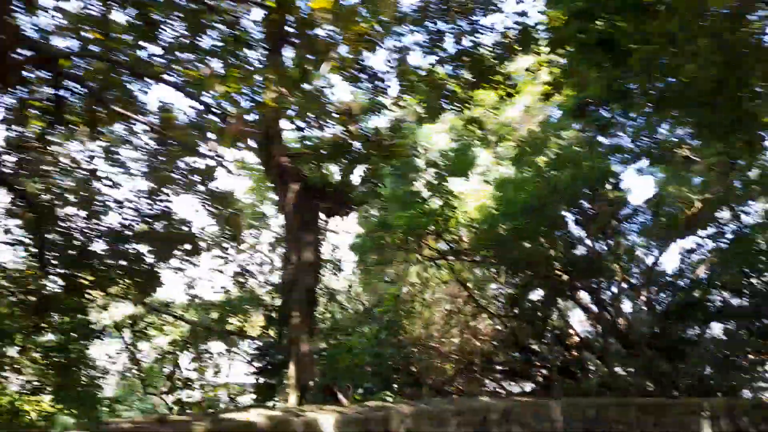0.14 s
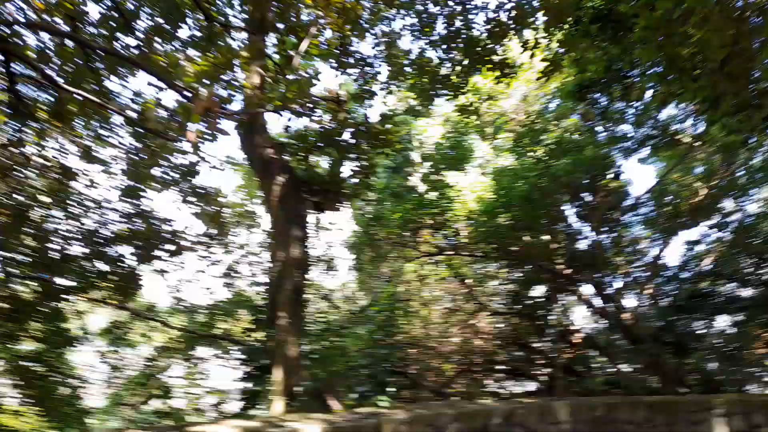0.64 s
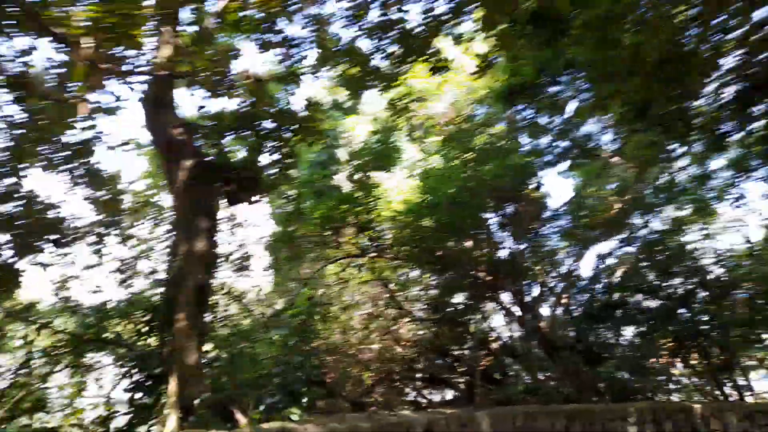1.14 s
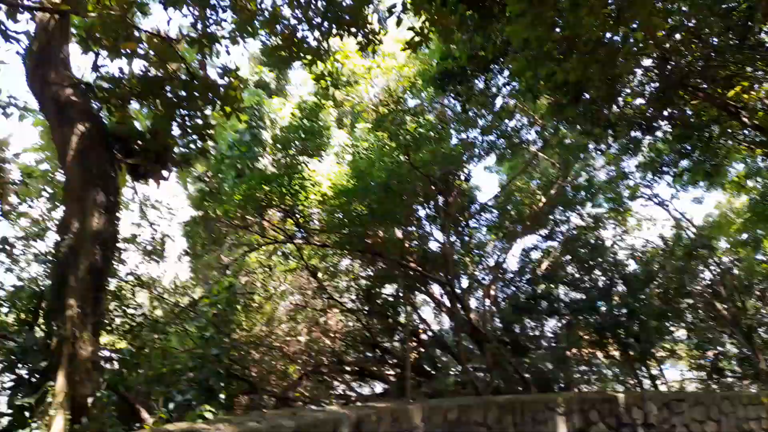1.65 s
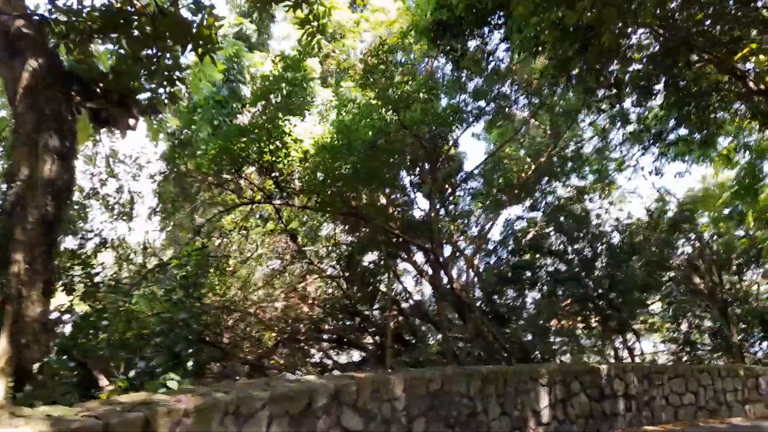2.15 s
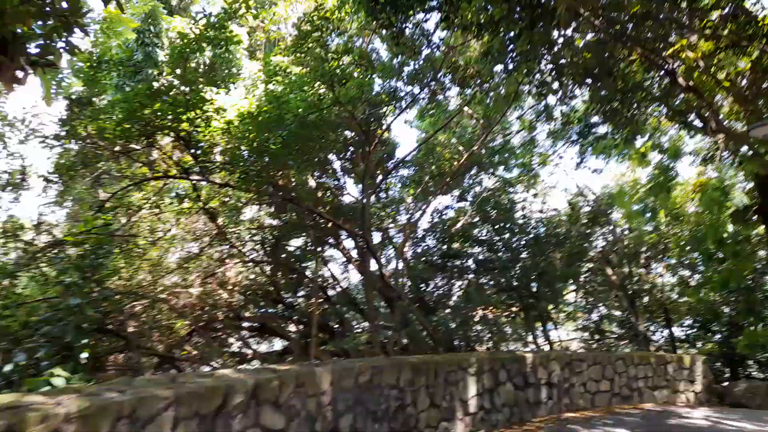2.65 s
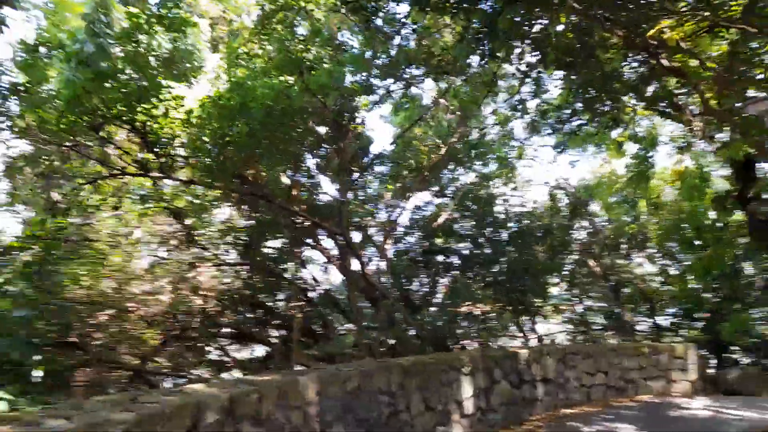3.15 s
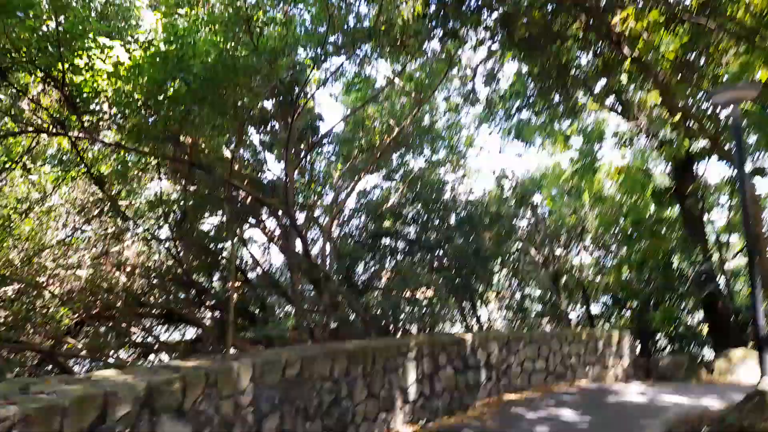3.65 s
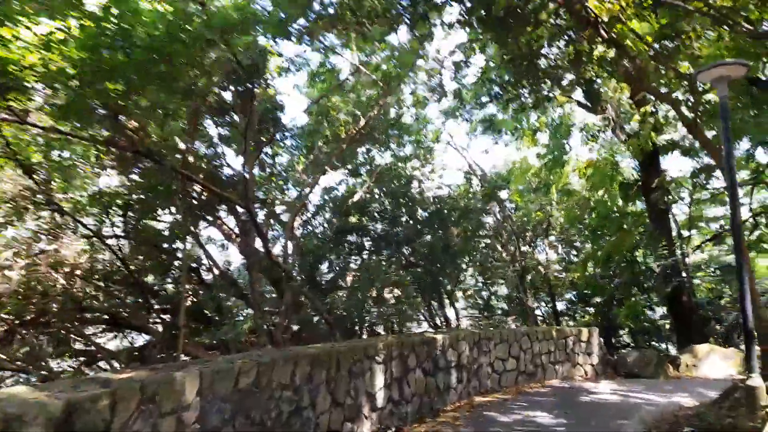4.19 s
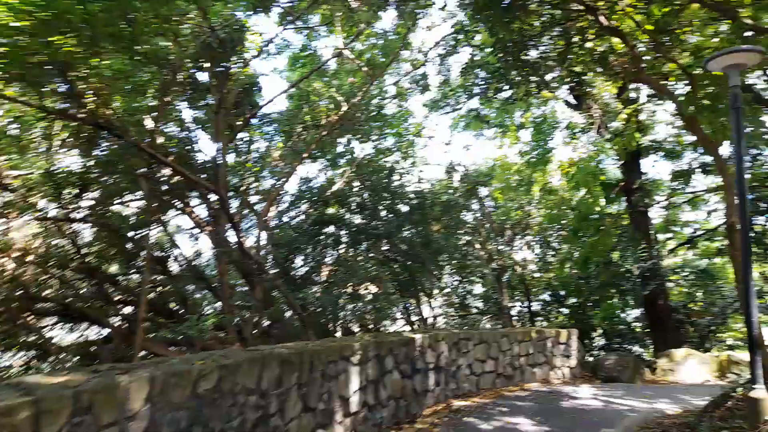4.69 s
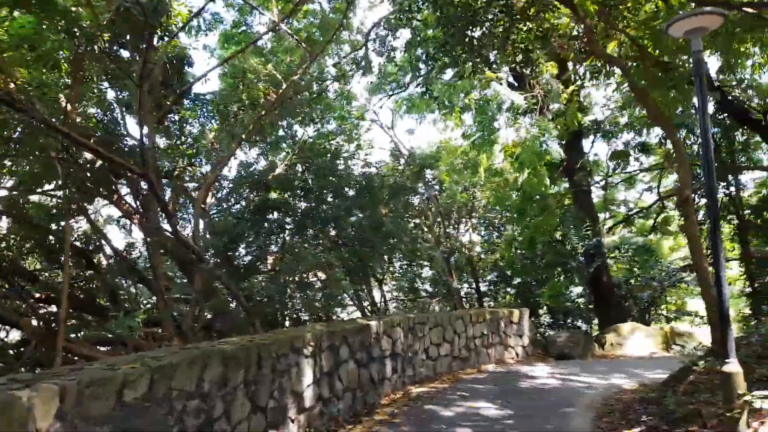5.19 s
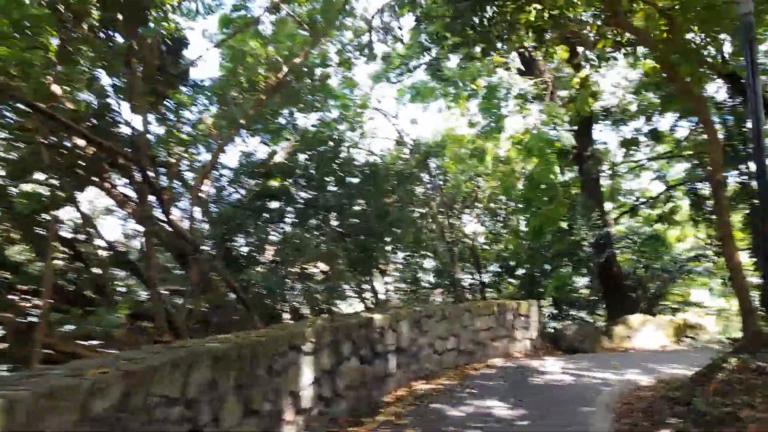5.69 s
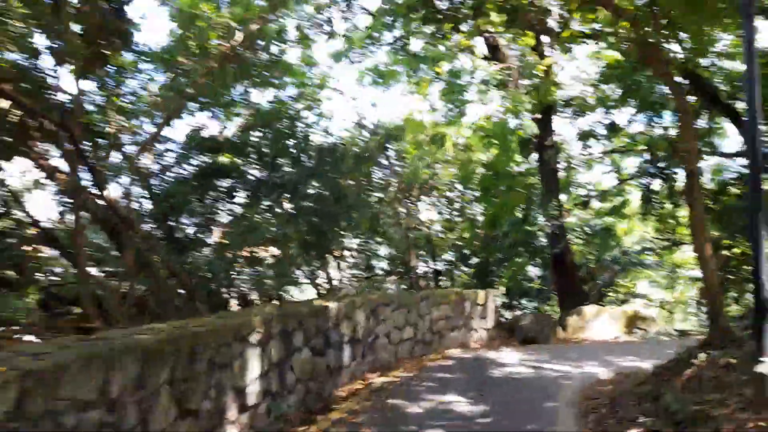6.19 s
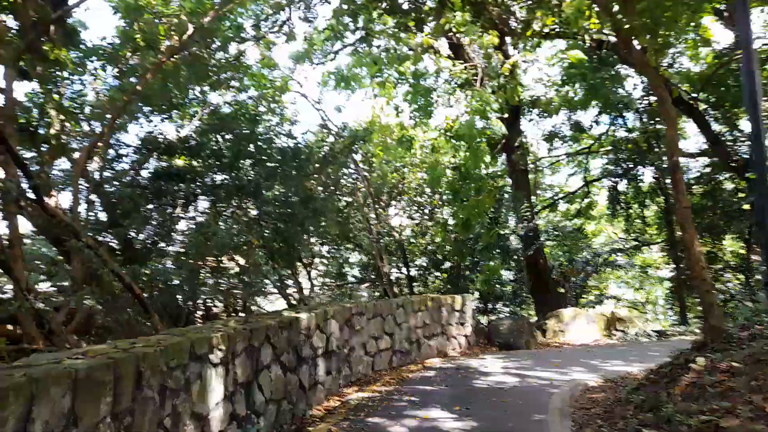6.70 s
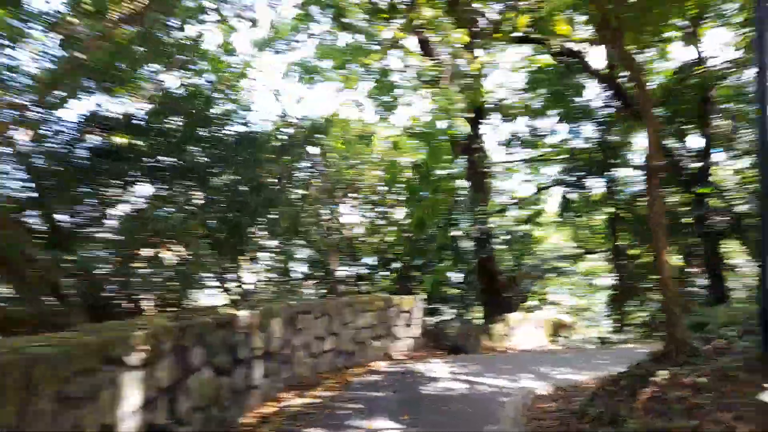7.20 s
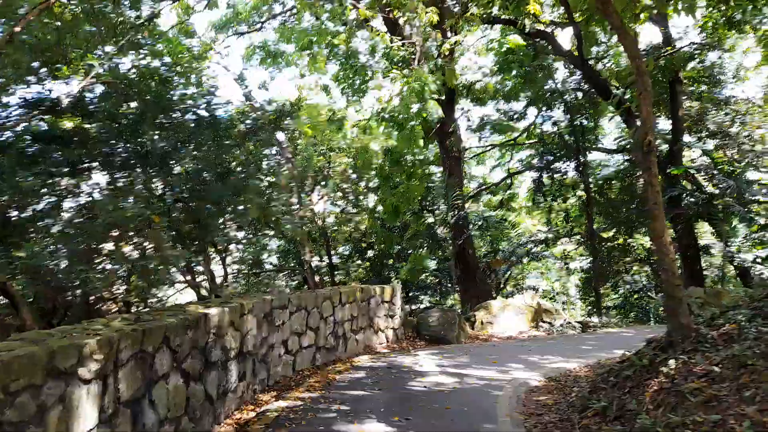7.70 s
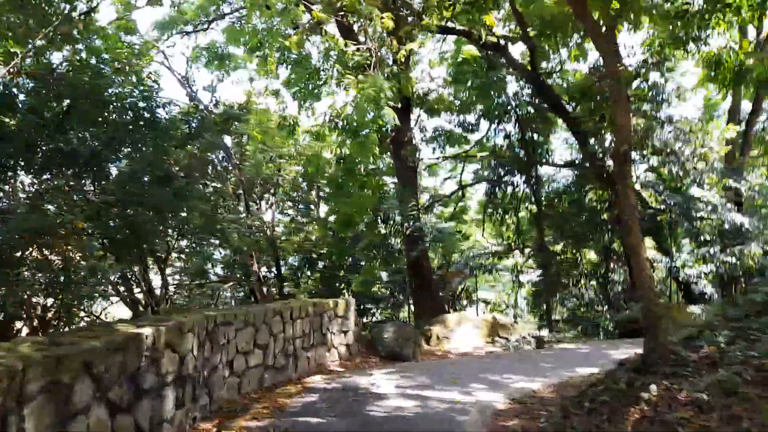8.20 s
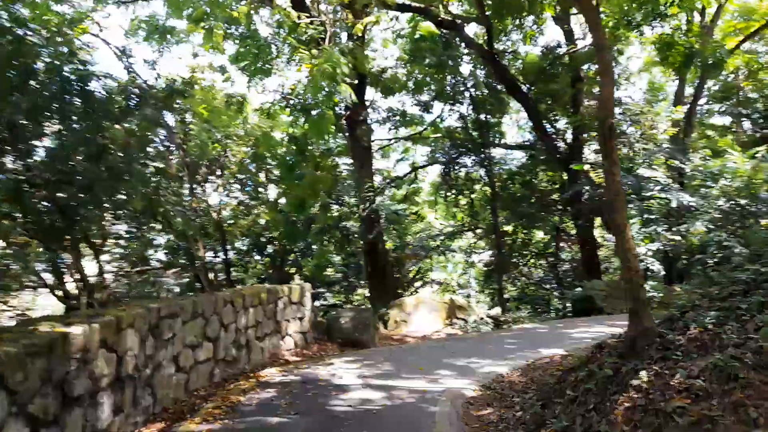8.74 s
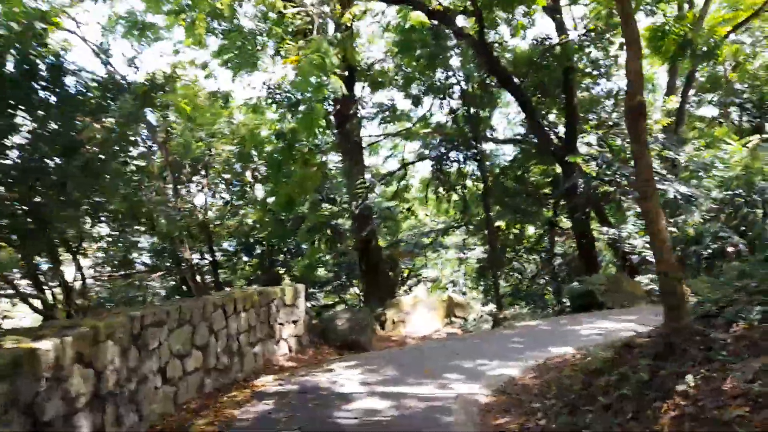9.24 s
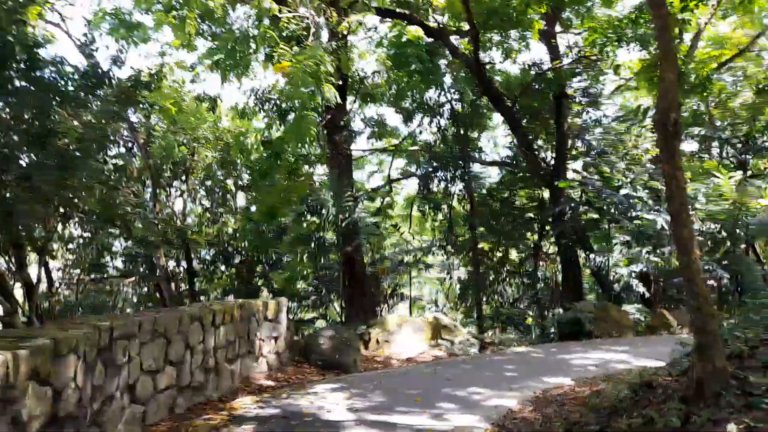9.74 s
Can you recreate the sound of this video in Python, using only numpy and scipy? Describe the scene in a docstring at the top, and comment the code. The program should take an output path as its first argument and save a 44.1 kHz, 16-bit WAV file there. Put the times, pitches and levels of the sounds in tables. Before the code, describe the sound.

Several cicadas sing shrill pulsing phrases about once a second over a hissing far chorus, with small bird calls, grit crunches and distant traffic rumble.

```python
"""Three cicadas in a wooded park

Three cicadas sing falling phrases, as rib overtones on a slowing beat, over a far chorus of banded noise.
Small birds whistle and chirp in gliding tones; a far crow caws through a moving throat resonance.
Shoes crunch grit and snap twigs in bursts of filtered cracks, and the hand-held camera is knocked.
Leaf noise, town rumble and narrow bands of engine drone lie underneath; tree echoes surround the nearer sounds."""
import sys
import numpy as np
from scipy import signal
from scipy.fft import rfft, irfft
from scipy.io import wavfile
from scipy.ndimage import uniform_filter1d

SR = 44100
rng = np.random.default_rng(int(sys.argv[2]) if len(sys.argv) > 2 else 0)


def int16_out(signal):
    """Quantize to a 16-bit WAV file."""
    q = np.round(np.clip(np.atleast_2d(signal).T, -1, 1) * 32767)
    wavfile.write(sys.argv[1], SR, q.astype(np.int16))


def natural_amplitude(level_db):
    """Convert a level in decibels to a linear amplitude factor, elementwise."""
    exponent = np.asarray(level_db, float) / 20
    return 10 ** exponent


N = 434826


def evened(x):
    """Scales to rms 1."""
    return x / np.sqrt(np.mean(x ** 2) + 1e-20)


def read(points, hz):
    """Reads a spectrum on a log-frequency axis."""
    f, value = np.transpose(points)
    return np.interp(np.log(hz + 1), np.log(f + 1), value)


def curves(rows, t):
    """Every column of a time table at times t."""
    time_s, *columns = np.transpose(rows)
    return [np.interp(t, time_s, column) for column in columns]


def add(mix, start_s, sound, side_db):
    """Places a sound at start_s, leaning left by side_db."""
    part = mix[:, round(start_s * SR):][:, :len(sound)]
    part += natural_amplitude([[side_db / 2], [-side_db / 2]]) * sound[:part.shape[1]]


# how alike diffuse noise is at the two microphone ports: pitch_hz, likeness (1 same, 0 unrelated, -1 opposite)
LIKENESS = [(60, 1), (250, 0.83), (450, 0.76), (800, -0.14), (1200, -0.2), (2500, 0.069), (12000, 0.076)]


def noise(colour, patchy_db):
    """Diffuse stereo noise of rms 1, coloured over frequency, with drifting loud and soft patches."""
    frames, hz = N // 512 + 5, np.fft.rfftfreq(2048, 1 / SR)
    a, b, c, d, patches = rng.standard_normal((frames, 1025, 5)).T
    patches = uniform_filter1d(patches, size=20, axis=0)  # over frequency
    patches = evened(uniform_filter1d(patches, size=8, axis=1))  # over time
    same = np.clip(read(LIKENESS, hz), -1, 1)[:, None]
    left = a + 1j * b
    right = same * left + np.sqrt(1 - same ** 2) * (c + 1j * d)
    spectrum = np.array([left, right]) * colour(hz)[:, None] * natural_amplitude(patchy_db * patches)
    return evened(signal.istft(spectrum, nperseg=2048, noverlap=1536)[1][:, :N])


def wood(x, t60, echo_db):
    """Direct sound plus scattering by trunks and leaves: sparse taps for each ear, shifting at 1.9 Hz."""
    at = np.arange(200, SR // 2 - 20, 20)
    echoes = np.zeros((2, N))
    for k in range(3):
        taps = np.zeros((2, SR // 2))
        place = at + rng.integers(0, 20, (2, len(at)))
        sign = rng.choice([-1., 1.], (2, len(at)))
        np.put_along_axis(taps, place, sign * natural_amplitude(-60 * at / SR / t60), 1)
        # three tap sets trade places; the squares of their shares sum to 1
        share = np.sqrt(2 / 3) * np.cos(2 * np.pi * (1.9 * np.arange(N) / SR + k / 3))
        echoes += signal.oaconvolve(x * share, taps / np.linalg.norm(taps[0]), axes=1)[:, :N]
    return x + natural_amplitude(echo_db) * echoes


# spectrum of the distant town: pitch_hz, relative level_db per Hz
TOWN_SPECTRUM = [(15, -46), (25, -31), (59, -17), (113, -2.5), (257, -3), (332, -5), (396, -10), (574, -7),
                 (884, -8.5), (1140, -12.5), (2700, -23.5), (3510, -28), (5940, -120)]


def town_rumble():
    """Distant town: low diffuse noise, a little stronger on the right."""
    level_db = -47 + np.array([[.5], [1.5]])
    return natural_amplitude(level_db) * noise(lambda hz: natural_amplitude(read(TOWN_SPECTRUM, hz)), 0.8)


# far engines pulling through a gear: start_s, length_s, from_hz, to_hz, level_db
ENGINE_PULLS = [(0.266, 1.55, 90.6, 127.7, -50.5), (2.088, 1.44, 93.6, 100, -48),
                (1.1, 2.6, 58.4, 57.95, -55.5), (4.753, 2.2, 38.63, 55.1, -57),
                (7.003, 1.84, 53.4, 57.84, -51.5), (8.808, 1, 59.1, 61.2, -47.5)]
# steady far traffic: pitch_hz, width_hz, level_db
TRAFFIC_DRONES = [(56.8, 25, -53.5), (102.9, 15, -56.5)]


def engines():
    """Narrow wavering bands of far traffic, nearly the same in both ears; most pulls climb in pitch."""
    pull_width_hz, pull_firm = 6, .8  # firm: the share of steady tone in the amplitude
    hop = 100  # samples between points of the slow waver
    out, t = np.zeros((2, N)), np.arange(N) / SR
    rows = [(-1, 12, hz, hz, db, width_hz, 0) for hz, width_hz, db in TRAFFIC_DRONES]
    rows += [row + (pull_width_hz, pull_firm) for row in ENGINE_PULLS]
    for start_s, length, from_hz, to_hz, db, width_hz, firm in rows:
        u = np.clip((t[::hop] - start_s) / length, 0, 1)
        r = np.exp(-np.pi * width_hz * hop / SR)
        draws = rng.standard_normal((len(u), 2, 2)) @ [1, 1j]
        common, apart = signal.lfilter([1], [1, -2 * r, r * r], draws, axis=0).T
        size = np.sqrt(np.mean(abs(np.array([common, apart])) ** 2) / 2)
        slow = (common + 0.23 * apart * np.array([[1], [-1]])) / size
        slow = (firm + np.sqrt(1 - firm ** 2) * slow / np.sqrt(2)) * np.sqrt(2)
        slow = slow * np.clip(np.minimum(u, 1 - u) * length / 0.24, 0, 1)  # fades in and out
        hz = np.interp(t, t[::hop], from_hz + (to_hz - from_hz) * u)
        for ear in (0, 1):
            waver = np.interp(t, t[::hop], slow[ear])
            out[ear] += natural_amplitude(db) * (waver * np.exp(2j * np.pi * np.cumsum(hz) / SR)).real
    return out * natural_amplitude([[-.4], [.6]])


# spectrum of the leaves: pitch_hz, relative level_db per Hz
LEAF_SPECTRUM = [(1500, -1), (2500, 0.5), (4000, 0), (5300, -4), (6800, 0), (7150, -41), (7800, -8.5),
                 (8400, -4), (11000, -11.5), (13600, -7), (14200, -18), (16000, -37)]


def leaf_rustle():
    """Leaves all around: diffuse patchy noise above 1 kHz."""
    return natural_amplitude(-51.5) * noise(lambda hz: natural_amplitude(read(LEAF_SPECTRUM, hz)) * (hz > 1000), 2.36)


# body bands of the far chorus and of the rattle that ends a phrase: pitch_hz, width_hz, relative level_db
BODY_BANDS = [(3135, 425, -10.5), (6186, 630, -14), (9430, 860, -18), (10450, 1800, -23.5),
              (12280, 930, -0.5), (13160, 640, -15), (15300, 500, -34)]


def body_gain(hz):
    """Gain of the cicada body: steep-sided humps, summed in power."""
    return np.sqrt(sum(natural_amplitude(2 * db) / (1 + (2 * (hz - f) / abs(w)) ** 4) ** 2 for f, w, db in BODY_BANDS))


# far chorus over time: time_s, level_db before the lean to the left
CHORUS_LEVEL = [(0, -40.5), (1.5, -41.5), (3, -40.5), (4.5, -41.5), (6, -43), (7, -40), (8, -39), (9, -41),
                (9.86, -40.5)]


def far_chorus():
    """Many distant cicadas merge into noise in the body bands, 3 dB stronger on the left."""
    level_db = curves(CHORUS_LEVEL, np.arange(N) / SR)[0]
    return natural_amplitude(level_db + np.array([[1.5], [-1.5]])) * noise(body_gain, 1.54)


# far crow, before tree echoes: time_s, level_db, throat_hz
CROW_CAW = [(9.02, -61, 1220), (9.1, -60, 1230), (9.18, -67, 1420), (9.35, -58, 1440), (9.6, -65, 1400),
            (9.68, -73, 1400)]


def crow():
    """A far, slightly hoarse harmonic caw through one moving throat resonance."""
    pitch_hz, throat_width_hz = 307.6, 260
    t = np.arange(CROW_CAW[0][0], CROW_CAW[-1][0], 1 / SR)
    level_db, throat_hz = curves(CROW_CAW, t)
    jitter = 0.24 * uniform_filter1d(rng.standard_normal(len(t)), size=300)
    turns = np.cumsum(pitch_hz * (1 + jitter)) / SR
    caw = 0
    for k in range(5, 14):  # steps of half the pitch; the odd ones are weak
        weight = .3 if k % 2 else 1
        throat = 1 / (1 + ((k * pitch_hz / 2 - throat_hz) / throat_width_hz) ** 2)
        caw = caw + weight * throat * np.cos(np.pi * k * turns)
    out = np.zeros((2, N))
    add(out, t[0], natural_amplitude(level_db) * evened(caw), 1.5)
    return out


# bird whistles, before tree echoes: start_s, length_s, from_hz, to_hz, level_db
BIRD_WHISTLES = [(0.203, 0.16, 5450, 3360, -55.5), (1.654, .12, 6880, 6530, -57),
                 (2.179, 0.13, 5400, 3150, -47.5), (2.513, 0.13, 5330, 3460, -52.5),
                 (4.14, 0.13, 6920, 6680, -57), (4.38, 0.075, 4000, 4850, -59),
                 (4.498, 0.1, 3600, 3740, -58.5), (4.633, 0.1, 5350, 3750, -53.5),
                 (4.72, 0.18, 799, 883, -58), (4.96, 0.095, 870, 880, -61), (5.09, .08, 829, 886, -57),
                 (2.82, 0.27, 1107, 1080, -64), (7.742, .14, 587, 594, -60.5), (9.5, 0.15, 816, 838, -63),
                 (4.848, 0.26, 1685, 1755, -68), (5.124, 0.1, 2740, 2700, -63),
                 (5.377, 0.058, 5340, 5200, -63), (6.489, 0.11, 6840, 6640, -56),
                 (6.497, .14, 900, 987, -62), (6.77, 0.11, 4340, 4900, -63), (6.941, 0.08, 5420, 3680, -54),
                 (7.39, 0.096, 5360, 3260, -48.5), (8.085, 0.076, 4060, 4940, -57.5),
                 (9.08, 0.085, 6760, 6650, -60), (9.51, 0.157, 3540, 3730, -60.5),
                 (9.645, 0.083, 4900, 3250, -60)]


def bird_whistles():
    """Near-sine wavering whistles; falling ones hold, plunge and level out."""
    out = np.zeros((2, N))
    for start_s, length, from_hz, to_hz, db in BIRD_WHISTLES:
        u = np.linspace(0, 1, round(length * SR))
        glide = u ** 3.6 * (1 + .09) / (u ** 3.6 + .09) if to_hz < from_hz else u
        tone = np.sin(2 * np.pi * np.cumsum(from_hz + (to_hz - from_hz) * glide) / SR)
        waver_db = 2.2 * evened(uniform_filter1d(rng.standard_normal(SR // 2), size=350))[:len(u)]
        shape = signal.windows.tukey(len(u), .5)
        add(out, start_s, natural_amplitude(db) * np.sqrt(2) * tone * natural_amplitude(waver_db) * shape, 0)
    return out


# buzzy chirps, before fading and tree echoes: start_s, centre_hz, level_db
BIRD_CHIRPS = [(2.095, 2500, -53), (4.255, 2430, -45.5), (4.85, 2700, -50), (6.25, 2670, -64),
               (6.57, 2180, -54), (6.58, 2620, -50), (6.85, 2230, -47.5), (8.24, 2480, -55.5),
               (9.585, 2460, -46.5), (9.81, 2380, -46)]


def bird_chirps():
    """Short falling chirps chopped by a 140 Hz flutter."""
    out = np.zeros((2, N))
    t = np.arange(round(.035 * SR)) / SR
    chop = 2.2 + np.cos(2 * np.pi * 140 * t)
    for start_s, hz, db in BIRD_CHIRPS:
        tone = np.sin(2 * np.pi * hz * (1.05 * t - 1.5 * t ** 2))  # slides down a tenth
        add(out, start_s, natural_amplitude(db) * evened(chop * tone) * np.hanning(len(t)), 0)
    return out


def crackle(rows):
    """Bursts of tiny uneven cracks, each coloured by one hump, rising fast and dying away."""
    out = np.zeros((2, N))
    hz, t = np.fft.rfftfreq(8192, 1 / SR), np.arange(8192) / SR
    for start_s, length, db, centre_hz, octaves in rows:
        cracks = rng.standard_normal(8192) * natural_amplitude(2.7 * rng.exponential(1, 8192))
        colour = np.exp(-.5 * (np.log2(hz / centre_hz + 1e-6) / octaves) ** 2)
        shape = np.minimum(t / length / 0.12, 1) * np.exp(-(t / length) ** 2)
        add(out, start_s, natural_amplitude(db) * evened(irfft(rfft(cracks) * colour)) * shape, -1.5)
    return out


# grit under a shoe, before decay and echoes: start_s, length_s (decay), level_db, centre_hz, width_octaves
GRIT_CRUNCHES = [(1.487, 0.07, -51.5, 4300, 0.55), (2.688, 0.01, -39, 3020, 0.68),
                 (3.393, 0.025, -45.5, 2150, 1.1), (5.196, 0.085, -49, 1700, 1.1),
                 (5.721, 0.099, -46, 3500, 2.3), (5.8, 0.067, -36.5, 9600, 1.2),
                 (5.842, .05, -51, 7000, 1.3), (8.183, 0.0074, -41.5, 3460, .87),
                 (8.866, 0.046, -36.5, 5460, 2), (8.955, .037, -41, 9000, 1.2),
                 (9.804, 0.075, -51.5, 4600, 0.19)]


def grit():
    """Grains grind and crack under a shoe close by."""
    return crackle(GRIT_CRUNCHES)


# dry twigs and leaves snapping, before decay and echoes: start_s, level_db, centre_hz
TWIG_SNAPS = [(2.783, -39.5, 3020), (2.829, -38, 3200), (2.847, -39, 3800), (2.869, -38, 3300),
              (8.322, -37, 4370), (8.328, -37, 4800), (8.342, -31, 3980), (8.357, -53, 4920),
              (8.456, -40, 4300), (8.464, -40, 4180), (8.495, -46, 5000)]


def twigs():
    """Dry twigs and leaves snap: crack bursts that die within milliseconds."""
    length_s, width_octaves = .003, .55
    return crackle([(start_s, length_s, db, hz, width_octaves) for start_s, db, hz in TWIG_SNAPS])


# knocks at the camera: start_s, pitch_hz, level_db (peak of the main mode before decay and echoes), t60_s
CAMERA_KNOCKS = [(5.195, 790, -34, 0.065), (5.26, 650, -39, 0.084)]
# modes of the camera case: multiple of the knock's pitch, relative level_db
CASE_MODES = [(.61, -8), (1, 0), (1.28, -6), (1.5, -11)]


def knocks():
    """Dull knocks of the camera in the hand: damped sine modes of its case."""
    out = np.zeros((2, N))
    t = np.arange(8192) / SR
    for start_s, hz, db, t60 in CAMERA_KNOCKS:
        ring = sum(natural_amplitude(mode_db) * np.sin(2 * np.pi * k * hz * t) for k, mode_db in CASE_MODES)
        add(out, start_s, natural_amplitude(db - 60 * t / t60) * np.minimum(t / 0.0026, 1) * ring, 0.1)
    return out


# eight ribs buckle in each beat, so multiples of eight stand out: multiple of the beat, relative level_db
RIB_OVERTONES = [(8, -22), (15, -31.5), (16, -17.5), (17, -32), (22, -35.5), (24, -27), (25, -35),
                 (26, -32), (27, -59.5), (28, -58.5), (29, -33), (30, -22), (31, -22), (32, -1.5),
                 (33, -16), (34, -27), (35, -24), (39, -39), (40, -29.5)]


def cicada(phrases, top_hz, bow, start_db, end_db, rattle, dull_db, uneven_db, rattle_db, side_db, lag_s):
    """Steady rib overtones on a slowing muscle beat; each phrase breaks into a short toneless rattle."""
    swell_s, tire_s, flutter_db = 0.19, 0.055, 3.0  # level offsets fade over swell_s, return over tire_s
    out = np.zeros((2, N))
    for start_s, length, hold_db, lost_hz in phrases:
        t = np.arange(max(start_s, 0), start_s + length, 1 / SR)
        age = t - start_s
        u = age / length
        level_db = (hold_db + start_db * np.maximum(1 - age / swell_s, 0)
                    + end_db * np.maximum(1 - (length - age) / tire_s, 0))
        drift, flutter = (evened(uniform_filter1d(v, size=500)) for v in rng.standard_normal((2, len(t))))
        beat_hz = top_hz - lost_hz * (u + bow * u * (1 - u))  # slows fastest at first
        beat_hz = beat_hz * (1 + .0007 * drift)
        turns = np.cumsum(beat_hz) / SR - np.outer([0, lag_s], beat_hz)  # lag_s delays the right port
        song = 0
        for k, db in RIB_OVERTONES:
            db = db + dull_db * (32 - k)  # tilt: positive is duller, as air makes a farther singer
            db = db + uneven_db * (k % 8 > 0)  # trims the overtones between, which unequal ribs fill in
            # the camera body shades the treble, so the lean grows with k
            lean_db = side_db * (k - 12) / 20 * np.array([[.5], [-.5]])
            song = song + natural_amplitude(db + lean_db) * np.sqrt(2) * np.cos(2 * np.pi * (k * turns + rng.random()))
        song *= natural_amplitude(level_db + flutter_db * flutter) * np.clip(np.minimum(age, length - age) / 0.013, 0, 1)
        start = round(t[0] * SR)
        out[:, start:start + len(t)] += song[:, :N - start]
        burst = np.hanning(round(.16 * SR))
        burst_at = start + len(t) - round(.07 * SR)  # the rattle begins just before the phrase ends
        end = slice(burst_at, burst_at + len(burst))
        out[:, end] += natural_amplitude(rattle_db) * rattle[:, end] * burst[:len(rattle[0, end])]
    return out


# low singer, before overtone sum, trim and echoes: start_s, length_s, level_db, beat_lost_hz
LOW_SONG = [(-.3, 0.64, -38, 10.5), (0.6, 0.65, -43, 8.9), (1.57, 0.67, -39, 8.2), (2.52, 0.51, -38.5, 6.8),
            (3.5, 0.74, -44, 10), (4.5, 0.84, -41, 11.7), (5.5, 0.84, -39.5, 9.8), (6.45, .61, -37.5, 8.3),
            (7.45, 0.72, -40, 8.7), (8.42, 0.66, -35.5, 8.4), (9.38, 0.65, -38, 9.7)]


def low_cicada(rattle):
    """The low, dull singer: slowest beat, fading strongly at each phrase end."""
    return cicada(LOW_SONG, 377.5, 0.297, -2, -23, rattle, 0.19, -2.3, -66, side_db=-0.5, lag_s=-0.000205)


# the near singer's mate, before overtone sum, trim and echoes: start_s, length_s, level_db, beat_lost_hz
MATE_SONG = [(0.15, 0.57, -29, 6.96), (1.08, .58, -28, 6.2), (2.02, .56, -28, 6.5), (2.94, 0.49, -26, 5.44),
             (3.83, 0.55, -28.5, 6.7), (4.73, 0.56, -29.5, 7.2), (5.62, 0.54, -31, 7),
             (6.52, .57, -30.5, 6.8), (7.4, 0.53, -31.5, 7.3), (8.27, 0.59, -31.5, 6.6),
             (9.17, 0.54, -33.5, 8.2)]


def mate_cicada(rattle):
    """The near singer's mate, to the left: almost the same beat, each phrase loudest at its start."""
    return cicada(MATE_SONG, 385.65, 0.264, 1.5, -7, rattle, -0.014, -3.0, -43, side_db=6.0, lag_s=0.000295)


# near singer, before overtone sum, trim and echoes: start_s, length_s, level_db, beat_lost_hz
NEAR_SONG = [(0.07, 0.42, -33, 4.2), (1.0, .45, -31.5, 4.7), (1.91, 0.59, -33, 5.05),
             (2.85, 0.49, -28.5, 4.96), (3.73, 0.5, -32.5, 6.5), (4.61, 0.5, -31.5, 4.6),
             (5.49, 0.51, -30.5, 6.2), (6.37, 0.52, -29, 4.2), (7.23, .5, -27.5, 6.8),
             (8.11, .48, -27, 6.46), (8.91, 0.48, -26.5, 6.84), (9.72, 0.57, -26, 7)]


def near_cicada(rattle):
    """The near singer, left of the microphone: each phrase swells from a quieter start."""
    return cicada(NEAR_SONG, 386.2, 0.184, -2, -0.83, rattle, 0.017, -4.5, -42.5, side_db=2.5, lag_s=0.0004174)


def scene():
    """Singers, birds, crow and shoes among the trees, over the steady floor."""
    rattle = noise(body_gain, 3.2)
    singers = near_cicada(rattle) + mate_cicada(rattle) + low_cicada(rattle)
    floor = far_chorus() + town_rumble() + leaf_rustle() + engines()
    far = wood(bird_whistles() + crow(), .8, 6.) + wood(bird_chirps(), .5, -1.)
    near = wood(natural_amplitude(-5.5) * singers, .25, 4.)
    near = near + wood(grit() + twigs() + knocks(), .22, -2.5)
    return near + far + floor


def band_limit(x):
    """A steep low-pass at the top of the band."""
    return signal.sosfilt(signal.butter(12, 15750, fs=SR, output="sos"), x)


def record(dry):
    """The small microphone loses the deepest bass, below about 33 Hz."""
    thinned = signal.sosfilt(signal.butter(2, 33, "high", fs=SR, output="sos"), dry)
    return band_limit(thinned)


dry = scene()
out = record(dry)
int16_out(out)
```